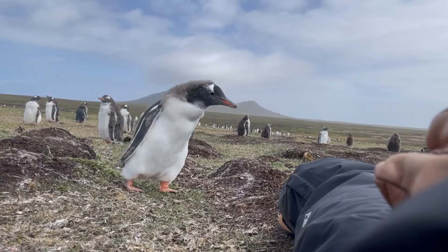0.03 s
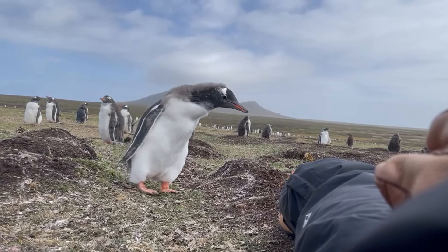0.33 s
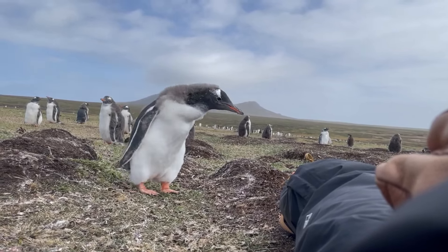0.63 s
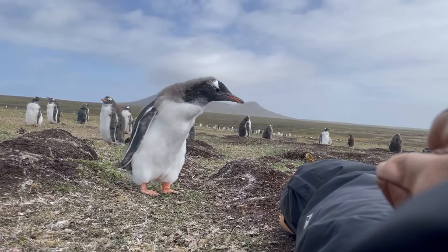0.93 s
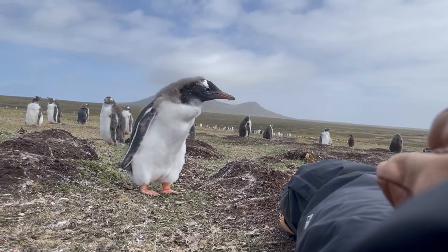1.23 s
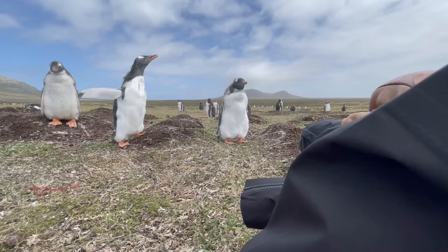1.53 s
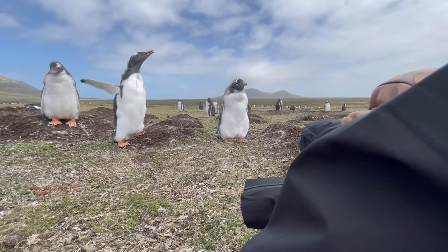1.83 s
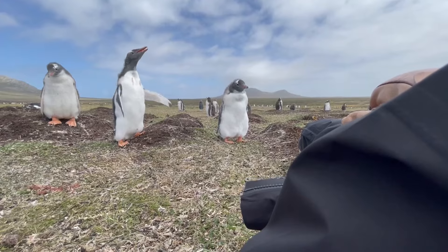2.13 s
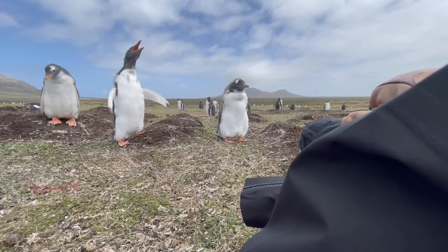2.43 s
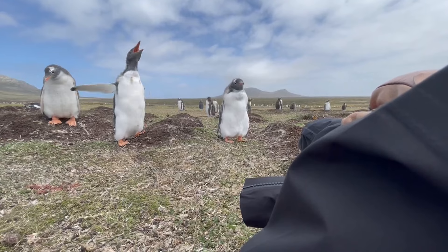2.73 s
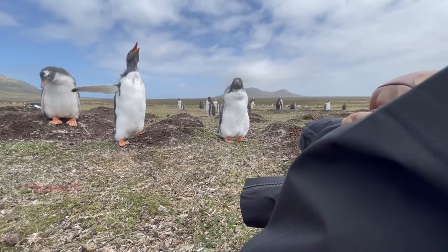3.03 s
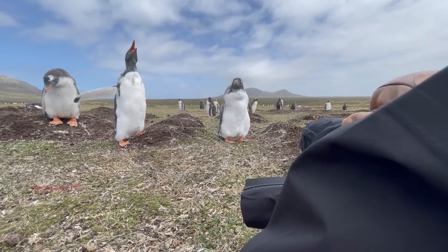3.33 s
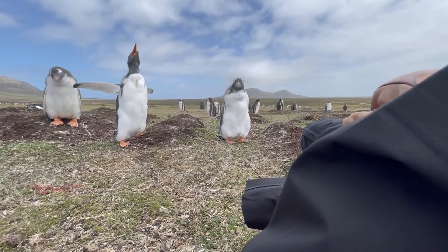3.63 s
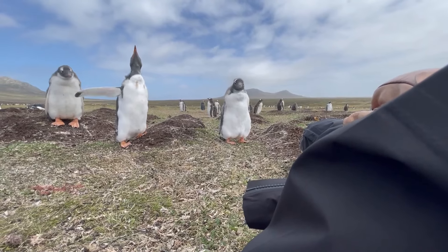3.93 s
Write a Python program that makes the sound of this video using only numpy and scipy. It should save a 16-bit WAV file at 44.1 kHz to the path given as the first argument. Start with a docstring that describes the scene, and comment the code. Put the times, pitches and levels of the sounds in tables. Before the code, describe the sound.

Two harsh, honking penguin brays nearby, with wind buffeting the microphone and distant chicks peeping.

```python
"""A windy penguin colony. At first wind rumbles and buffets on the microphone, while a far
penguin brays and chicks peep. From 2.3 s a bird close by, louder on the left, brays: a fast
see-saw of harsh pulsed honks and two-voiced whistles through one throat. It gives a soft moan
at 3 s and brays again from 3.2 s. The wind drops as this second bray ends."""
import sys
import numpy as np
from scipy import signal
from scipy.fft import rfft, irfft
from scipy.io import wavfile
from scipy.ndimage import map_coordinates

SR = 44100
rng = np.random.default_rng(int(sys.argv[2]) if len(sys.argv) > 2 else 0)


def pcm_store(signal):
    """Save signal as 16-bit PCM."""
    levels = np.round(np.clip(np.atleast_2d(signal), -1, 1) * 32767)
    wavfile.write(sys.argv[1], SR, levels.astype(np.int16).T)


N = 176400
TIME = np.arange(N) / SR

# Near bird's honks: t/s, length/s, level/dB, place of the peak/0-1, pulse rate/Hz, roughness/0-1
NEAR_HONKS = [(2.258, 0.076, -19, 0.79, 230.7, 0.26), (2.385, 0.025, -14.5, 0.82, 299, 0.39),
              (2.407, 0.04, -15.5, 0.03, 1266, .25), (2.447, 0.019, -17, 0.49, 447, 0.46),
              (2.495, 0.036, -13.5, 0.79, 439, 0.26), (2.525, 0.028, -10, 0.5, 642.3, 0.17),
              (2.549, 0.044, -8, 0.3, 236.9, 0.54), (2.609, 0.047, -7.5, 0.65, 470.1, 0.24),
              (2.646, 0.03, -22, 0.35, 687, 0.01), (2.678, 0.02, -11, 0.8, 427, 0.02),
              (2.696, 0.027, -9, 0.25, 240.8, 0.49), (2.769, 0.024, -16.5, 0.59, 240, 0.43),
              (2.842, 0.029, -18, 0, 238.4, 0.54), (2.884, 0.025, -29.5, 0.17, 249, 0.2),
              (3.21, 0.052, -16, .75, 231.2, 0.31), (3.33, 0.029, -18, 0.75, 479.4, 0.37),
              (3.389, 0.04, -7, 0.58, 244.9, 0.42), (3.45, 0.045, -7.5, 0.5, 245.8, 0.6),
              (3.525, 0.041, -8.5, 0.66, 485.5, 0.31), (3.605, 0.034, -10.5, 0.63, 478, 0.23),
              (3.678, 0.029, -14, 0.72, 481.8, 0.43), (3.75, 0.044, -24, 0.18, 243.6, 0)]
# Its soft note between the brays: one row, columns as for the honks
SOFT_MOAN = (3.04, .085, -41, .4, 355, .06)
# Its whistles: t/s, length/s, level into the throat/dB, top of low voice/Hz, top of high voice/Hz
NEAR_WHISTLES = [(2.463, 0.031, -20, 2763, 5200), (2.568, 0.044, -23, 3085, 5980),
                 (2.648, 0.037, -24.5, 2700, 4230), (2.71, 0.042, -23.5, 2903, 5000),
                 (2.785, 0.033, -26.5, 2777, 4980), (3.29, 0.038, -31, 2310, 4030),
                 (3.351, 0.04, -19, 2994, 5400), (3.414, 0.039, -19, 3150, 5950),
                 (3.48, 0.043, -19.5, 3096, 5780), (3.551, 0.047, -21.5, 3034, 5920),
                 (3.63, 0.035, -23, 2790, 4800), (3.696, 0.034, -30.5, 2650, 4260)]
# Throat resonances for the near bray, the moan and the far bray: f/Hz, gain/dB
NEAR_THROAT = [(100, -25.5), (450, -4), (650, -3), (800, 10), (970, 15.5), (1150, 16.5), (1400, 8),
               (1700, -4.5), (2100, -3), (2450, 5.5), (2700, 1.5), (3000, 0), (3350, -6), (3900, 5.5),
               (4350, -9.5), (5050, -5.5), (6100, -17.5), (7000, -34), (8200, -21.5), (9700, -37),
               (13500, -30.5), (16000, -40)]
SOFT_THROAT = [(200, -36), (700, 5), (1450, 2.5), (1900, -37.5), (6000, -40)]
DISTANT_THROAT = [(150, -11), (450, 10), (1100, 10), (1500, 10.5), (2300, 1.5), (4300, -4.5), (6500, -53)]
# Near bird's stereo image: f/Hz, right minus left/dB, phase lead of the left/rad
NEAR_STEREO_IMAGE = [(200, -5.5, 0.61), (603, -1.5, 2.2), (895, -7, 1.39), (1461, 4.5, 3.87),
                     (1610, 2, 4.87), (2280, -12, 4.69), (2816, -16, 5.56), (3510, -9, 14), (3745, -19, 39),
                     (5050, -15.5, 23), (7200, -10.5, 17.5), (9860, -1.5, 25.5)]
# Wind strength at the microphone: t/s, level/dB
WIND_STRENGTH = [(0, -39), (.45, -34), (.66, -43.5), (.8, -37), (1, -42.5), (1.35, -42.5), (1.5, -30),
                 (2.05, -30.5), (2.45, -27), (3, -28.5), (3.62, -30), (3.69, -44.5), (3.75, -54.5),
                 (4, -54)]
# Single buffets: t/s, relative puff level/dB, relative thud level/dB
WIND_BUFFETS = [(0.252, -38, -25.5), (0.722, -38, -25), (1.11, -40, -34), (1.684, -37.5, -35),
                (1.759, -37.5, -42), (1.905, -33.5, -19.5), (2.054, -30.5, -27), (2.147, -35.5, -15.5),
                (2.408, -23.5, -15.5), (2.915, -37, -18), (3.106, -29.5, -33)]
# Spectra of the wind's rumble, a buffet's puff and its low thud: f/Hz, gain/dB
RUMBLE_SPECTRUM = [(20, -35), (48, 0), (80, -1.5), (240, -17.5), (415, -28.5), (565, -31.5), (1200, -52.5),
                   (2640, -120)]
PUFF_SPECTRUM = [(100, -5.5), (300, 11.5), (700, 2.5), (1800, -23.5), (9000, -84)]
THUD_SPECTRUM = [(20, -33.5), (60, 5.5), (200, -6), (1500, -83)]
# Far bird's honks: t/s, level/dB
DISTANT_HONKS = [(.03, -50), (.095, -45.5), (.175, -49.5), (.78, -49.5), (.828, -54), (.905, -47.5),
                 (.975, -52.5), (1.45, -50.5), (1.505, -45.5), (1.572, -44.5), (1.643, -45.5), (1.712, -48)]
# Chicks' peeps: t/s, length/s, level/dB, first f/Hz, middle f/Hz, last f/Hz
CHICK_PEEPS = [(0.056, 0.047, -54.5, 3740, 3220, 2600), (0.663, 0.28, -64, 3450, 2910, 2884),
               (1.476, 0.068, -61, 4700, 3880, 3120), (1.53, 0.14, -57, 3000, 2770, 2850),
               (1.704, 0.17, -58, 3370, 3400, 3860), (2.334, 0.064, -39, 3670, 3040, 3040),
               (3.079, .14, -55.5, 4070, 3110, 3800)]
# Spectrum of the colony's wash: f/Hz, gain/dB
WASH_SPECTRUM = [(200, 4), (700, 0), (2200, -9), (3200, -6), (7000, -32.5), (14000, -25.5)]
# Rise and fall of the wash: t/s, level/dB
WASH_LEVEL = [(0, -62.5), (1.42, -67.5), (1.46, -52), (2.2, -61.5), (3.1, -59), (3.5, -50), (3.82, -62.5),
              (4, -68)]

CUTOFF_HZ = 15700


def near_penguin():
    """The bird close to the microphone: honks and whistles in turn, a moan between the brays."""
    voice = np.zeros(N)
    for start, *shape in NEAR_HONKS:
        add(voice, start, honk(NEAR_THROAT, *shape, near_bray=True))
    for start, *shape in NEAR_WHISTLES:
        add(voice, start, whistle(*shape))
    add(voice, SOFT_MOAN[0], honk(SOFT_THROAT, *SOFT_MOAN[1:]))
    return spread_in_stereo(voice)


def honk(throat, length, db, peak, pulse_hz, rough, near_bray=False):
    """Uneven pulses and puffs of air swell, ring the throat and stop."""
    pitch_sag, jitter, rasp_share, bill_sag = .051, .043, .8, .14
    rise_db, fall_db, edge_s = 12, 12.5, .005
    rasp_hz, dull_hz, full_treble_db, treble_growth = 3200, 2800, 9.5, .31
    t = np.arange(0, length, 1 / SR)
    bend = 1 + pitch_sag * (.5 - t / length) + jitter * drift(len(t), rate_hz=230)
    cycles = np.cumsum(pulse_hz * bend) / SR
    pulses = sum(np.cos(2 * np.pi * k * cycles) for k in range(1, int(CUTOFF_HZ / pulse_hz)))
    puffs = unit((.45 + np.exp(-(cycles % 1) / .25)) * rng.standard_normal(len(t)))
    drive = (1 - rough) * unit(pulses * amp(2 * drift(len(t), rate_hz=220))) + rough * puffs
    # high up, the pulses break into rasping air
    drive += rasp_share * signal.filtfilt(*signal.butter(2, rasp_hz, "high", fs=SR), puffs - drive)
    throat_rms = np.std(colour(drive, throat)[:len(t)])
    swell = amp(np.interp(t / length, [0, np.clip(peak, .05, .95), 1], [-rise_db, 0, -fall_db]))
    swell *= np.sin(np.pi / 2 * np.clip(np.minimum(t, length - t) / edge_s, 0, 1)) ** 2
    if near_bray:  # treble grows faster than the level
        body = signal.filtfilt(*signal.butter(2, dull_hz, fs=SR), drive)
        brightness = (swell * amp(db - full_treble_db)) ** treble_growth
        drive = body + brightness * (drive - body)
    sound = amp(db) * colour(drive * swell, throat) / throat_rms
    if near_bray:  # pitch and resonances sink at both ends, where the bill shuts
        shut = np.minimum((2 * np.arange(len(sound)) / len(t) - 1) ** 2, 1)
        sound = map_coordinates(sound, [np.cumsum(1 - bill_sag * (shut - .2))])
    return sound


def whistle(length, db, low_top_hz, high_top_hz):
    """Two voices each sing an arch in rushing air; the upper one fades at its top."""
    low_sag, jitter, overtone_db, flutter_db, air_db = .19, .02, -13, 3, -3
    high_ends_hz, high_loudest_hz, high_width_hz = 2880, 3900, 800
    u = np.arange(0, 1, 1 / (length * SR))
    bend = (2 * u ** .93 - 1) ** 2  # 0 at the top of the arch, 1 at its ends
    low_hz = low_top_hz * (1 - low_sag * bend * (.5 + .5 * u))
    high_hz = high_top_hz + (high_ends_hz - high_top_hz) * bend
    low, high = (wavering_phase(hz, jitter, rate_hz=600) for hz in (low_hz, high_hz))
    high_gain = 1 / (1 + ((high_hz - high_loudest_hz) / high_width_hz) ** 2)
    overtones = amp(overtone_db) * (np.sin(2 * low) + np.sin(2 * low + high))
    voices = np.sin(low) + high_gain * np.sin(high) + overtones
    voices *= amp(flutter_db * (drift(len(u), rate_hz=170) - 1))
    air = signal.lfilter(*signal.butter(2, low_top_hz, "high", fs=SR), rng.standard_normal(len(u)))
    drive = np.sqrt(2) * voices + amp(air_db) * air
    return amp(db) * colour(drive * np.sin(np.pi * u) ** .5, NEAR_THROAT)


def spread_in_stereo(voice, ground_db=-13, ground_t60_s=.12):
    """The voice is louder on the left, with level and phase between the sides varying by frequency."""
    hz = np.fft.rfftfreq(N, 1 / SR)
    right_gain = amp(read(NEAR_STEREO_IMAGE, hz)) * np.exp(-1j * read(NEAR_STEREO_IMAGE, hz, column=2))
    pair = np.array([voice, irfft(rfft(voice) * right_gain, N)])
    t = TIME[:SR // 4]
    tail = rng.standard_normal((2, len(t))) * amp(-60 * t / ground_t60_s)
    ground_scatter = signal.fftconvolve(pair, tail / np.linalg.norm(tail[0]), axes=1)[:, :N]
    return pair + amp(ground_db) * ground_scatter


def wind(shared_power=.8, trim_db=-.5, lump_db=5):
    """Wind on the microphone: lumpy rumble that follows its strength, and single buffets."""
    rumble = np.sqrt(shared_power) * noise(RUMBLE_SPECTRUM)
    rumble = rumble + np.sqrt(1 - shared_power) * wide_noise(RUMBLE_SPECTRUM)
    strength_db = trim_db + np.interp(TIME, *np.transpose(WIND_STRENGTH))
    pair = rumble * amp(strength_db + lump_db * drift(N, rate_hz=17.1))
    for start, puff_db, thud_db in WIND_BUFFETS:
        thud = amp(thud_db - 5) * turbulence(THUD_SPECTRUM, rise_s=.012)
        for side in pair:  # one thud for both sides, then a separate puff on each
            add(side, start - .015, thud)
            add(side, start, amp(puff_db + 5) * turbulence(PUFF_SPECTRUM, rise_s=.0025))
    return pair


def turbulence(spectrum, rise_s):
    """A burst of turbulent air that swells quickly and dies away."""
    u = np.arange(0, 8, 1 / (rise_s * SR))
    air = rng.standard_normal(len(u))
    return colour(air * u * np.exp(1 - u), spectrum) / np.std(colour(air, spectrum)[:len(u)])


def colony():
    """Distant braying and chicks, slightly left, over a wide wash that rises and falls."""
    calls = np.zeros(N)
    for start, db in DISTANT_HONKS:
        add(calls, start, honk(DISTANT_THROAT, length=.042, db=db, peak=.29, pulse_hz=370, rough=.35))
    for start, *shape in CHICK_PEEPS:
        add(calls, start, chick_peep(*shape))
    wash = unit(wide_noise(WASH_SPECTRUM) + .32 * noise(WASH_SPECTRUM))
    wash_db = np.interp(TIME, *np.transpose(WASH_LEVEL)) + 2 * drift(N, rate_hz=44)
    return calls * amp([[1], [-3]]) + wash * amp(wash_db)


def chick_peep(length, db, *pitches_hz, overtone_db=-28):
    """A thin, almost pure tone that glides through three pitches."""
    u = np.arange(0, 1, 1 / (length * SR))
    hz = np.polyval(np.polyfit([0, .5, 1], pitches_hz, 2), u)
    phase = wavering_phase(hz, jitter=.024, rate_hz=230)
    return amp(db) * np.sin(np.pi * u) * (np.sin(phase) + amp(overtone_db) * np.sin(2 * phase))


def wavering_phase(hz, jitter, rate_hz):
    """Phase of a voice whose pitch wanders by the share `jitter`."""
    return 2 * np.pi * np.cumsum(hz * (1 + jitter * drift(len(hz), rate_hz))) / SR


def drift(count, rate_hz):
    """Smooth random wander of rms about 1."""
    size = count + SR // 4
    smoothing = np.exp(-(np.fft.rfftfreq(size, 1 / SR) / rate_hz) ** 2)
    return unit(irfft(rfft(rng.standard_normal(size)) * smoothing, size))[:count]


def noise(spectrum):
    """Steady noise with the given spectrum."""
    return unit(colour(rng.standard_normal(N), spectrum)[:N])


def wide_noise(spectrum):
    """Independent noise on the left and right."""
    return np.array([noise(spectrum), noise(spectrum)])


def colour(x, spectrum, size=4096):
    """Minimum-phase filter with the given spectrum; leaves room for the ring."""
    log_gain = np.log(amp(read(spectrum, abs(np.fft.fftfreq(size, 1 / SR)))))
    taps = np.fft.ifft(np.exp(np.conj(signal.hilbert(log_gain)))).real
    return signal.fftconvolve(x, taps[:size // 2])


def read(points, hz, column=1):
    """Reads a table column on a log-frequency axis."""
    table = np.transpose(points)
    return np.interp(np.log(hz + 1), np.log(table[0] + 1), table[column])


def add(mix, start_s, sound):
    """Adds a sound at a time."""
    part = mix[max(round(start_s * SR), 0):][:len(sound)]
    part += sound[:len(part)]


def amp(db):
    """Decibels to gain."""
    return 10 ** (np.asarray(db) / 20)


def unit(x):
    """Scales to rms 1."""
    return x / np.sqrt(np.mean(x ** 2) + 1e-20)


def scene():
    """The bird close by, the colony in the distance, the wind on the microphone."""
    return near_penguin() + colony() + wind()


def record(dry, ceiling=.92):
    """The loudest peaks are rounded off, then the highest treble is cut."""
    rounded = dry / (1 + (dry / ceiling) ** 6) ** (1 / 6)
    lowpass = signal.firwin(511, CUTOFF_HZ, window=("kaiser", 9), fs=SR)
    return signal.oaconvolve(rounded, lowpass[None], "same")


dry = scene()
out = record(dry)
pcm_store(out)
```